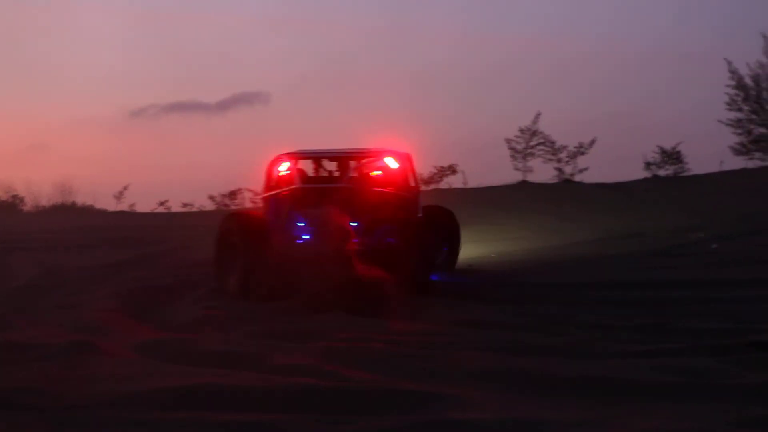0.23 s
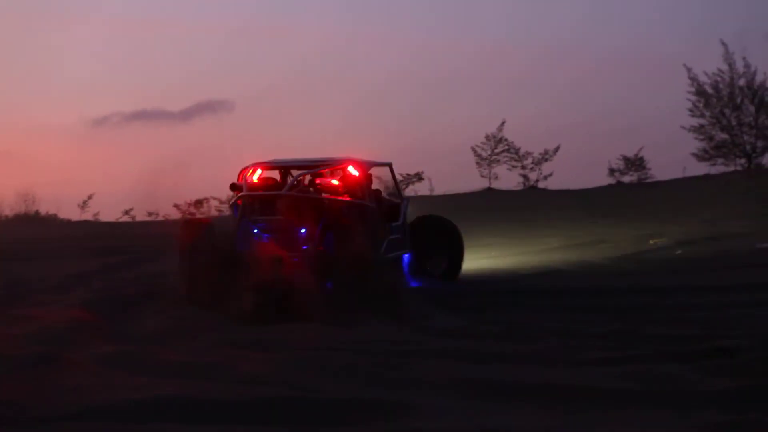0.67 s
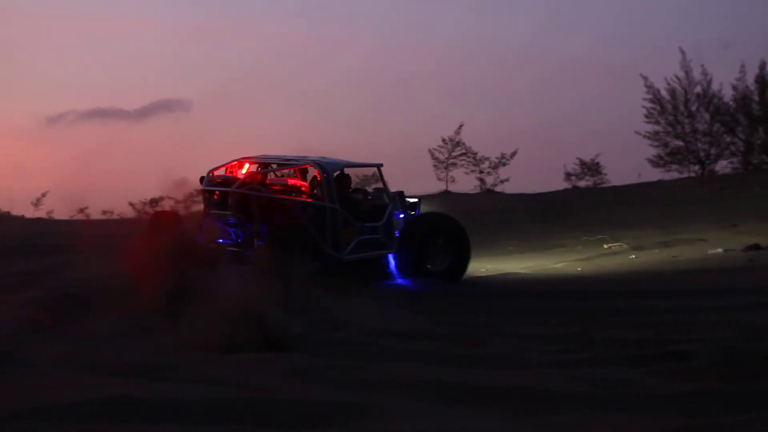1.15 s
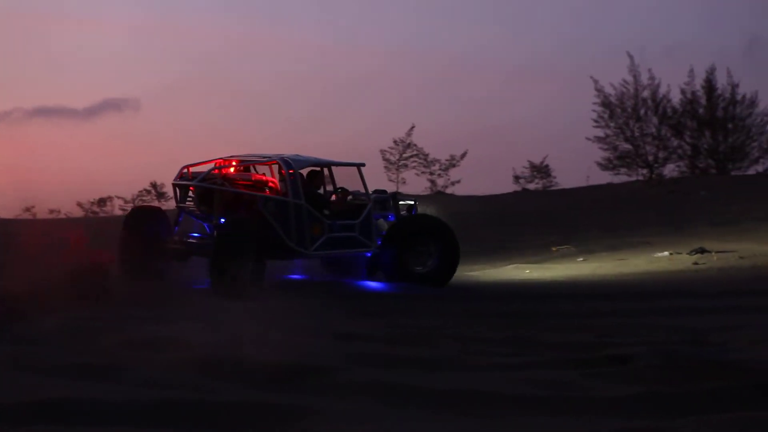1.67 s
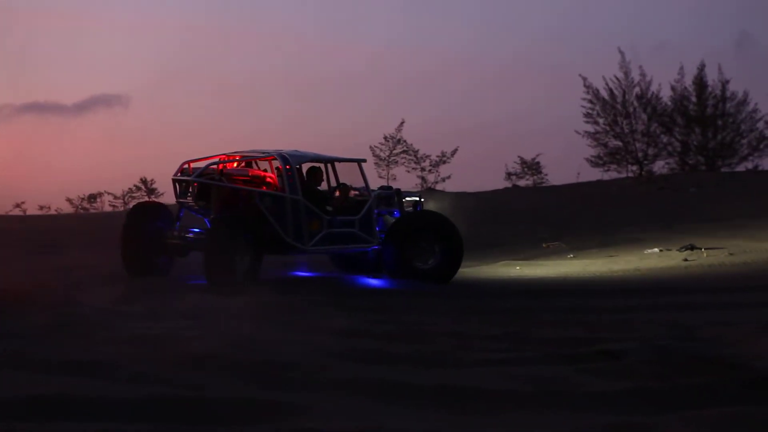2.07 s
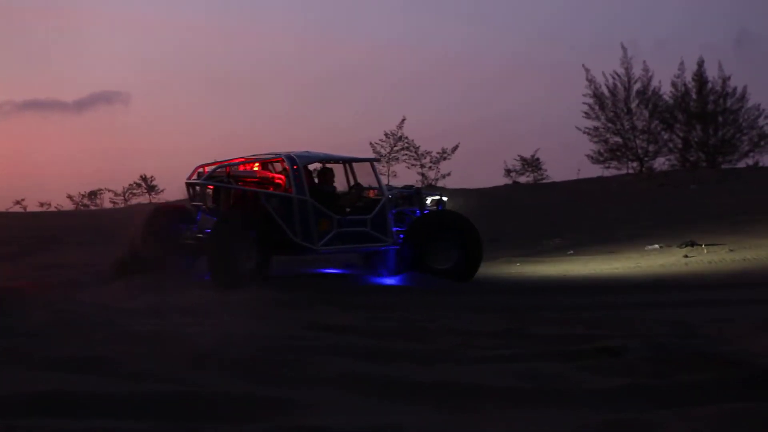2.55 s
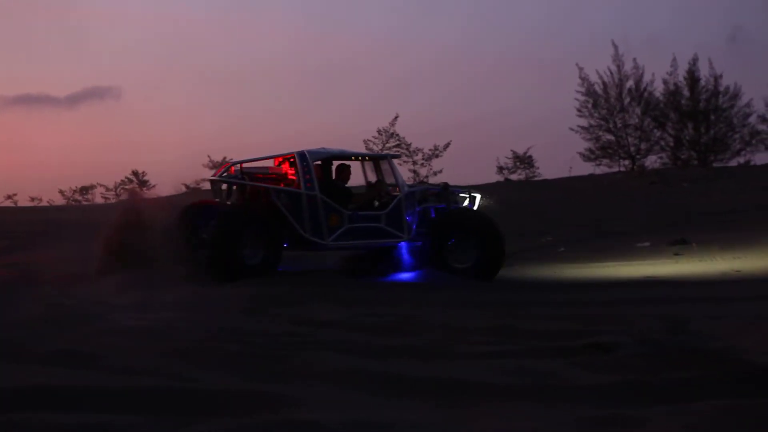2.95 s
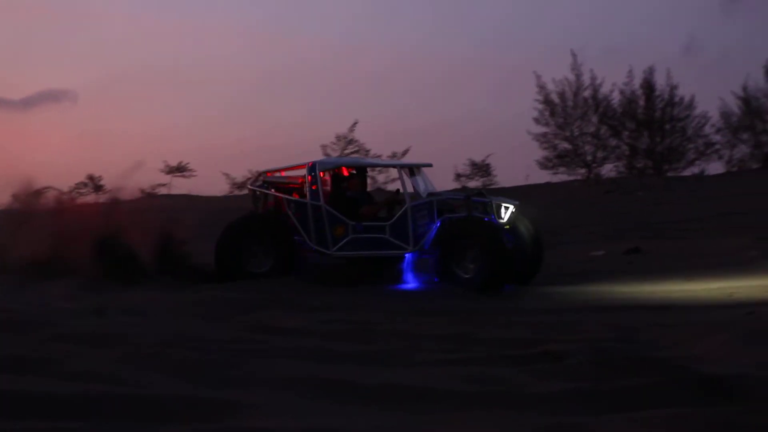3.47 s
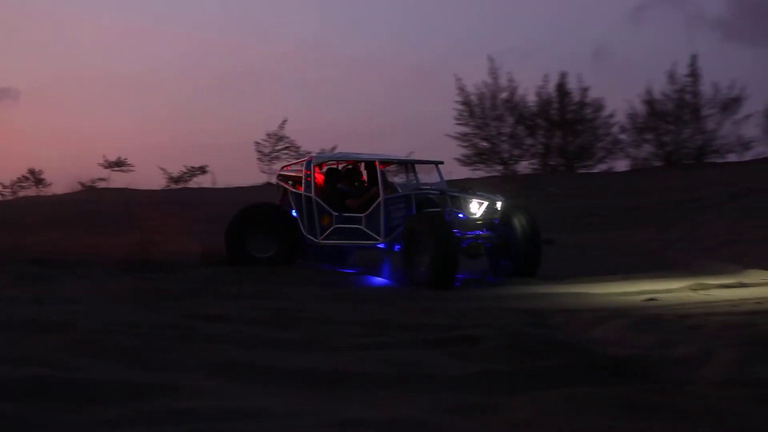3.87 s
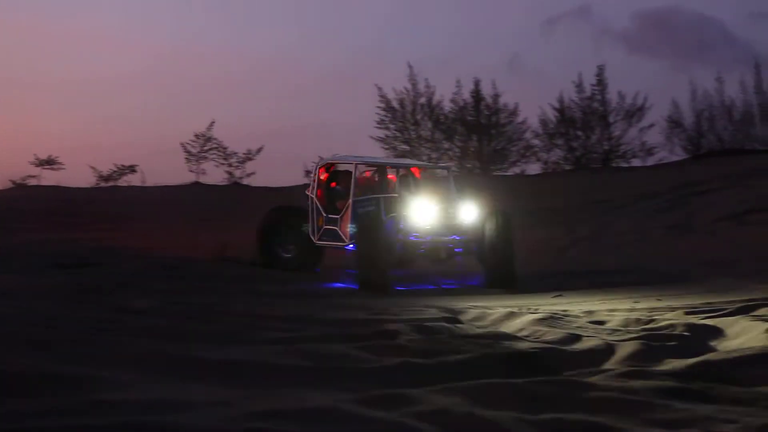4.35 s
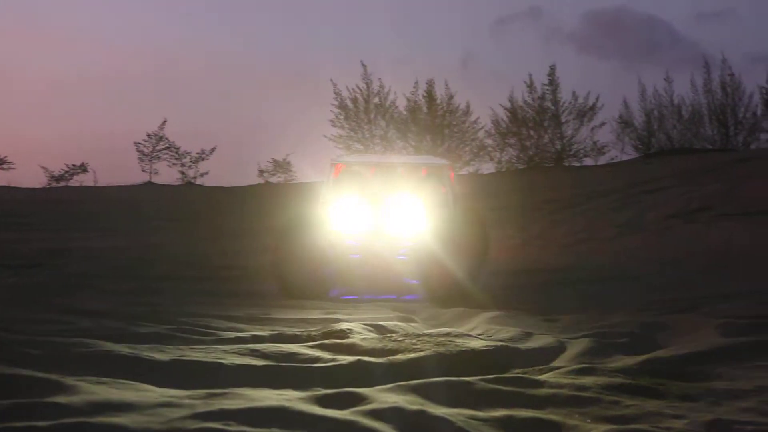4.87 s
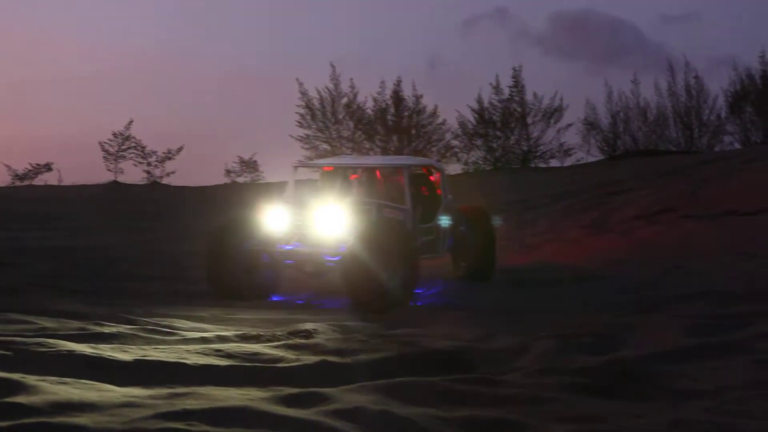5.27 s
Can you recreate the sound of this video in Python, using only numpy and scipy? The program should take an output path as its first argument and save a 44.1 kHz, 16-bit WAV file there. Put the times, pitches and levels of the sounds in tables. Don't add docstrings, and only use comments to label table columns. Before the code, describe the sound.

A large uneven-firing engine booms, growls and rasps as a buggy circles on sand. Two strong revs and a weaker third are separated by falling revs and sharp exhaust snaps. The treble dulls as the pipes turn away, a low airy fan wash remains, and brakes squeal at the very end. Mono, medium distance, open air.

```python
import sys
import numpy as np
from scipy import signal
from scipy.fft import rfft, irfft, next_fast_len
from scipy.io import wavfile
from scipy.ndimage import uniform_filter1d, map_coordinates

SR = 44100
rng = np.random.default_rng(int(sys.argv[2]) if len(sys.argv) > 2 else 0)


def unload_audio(sound):
    columns = np.transpose(np.atleast_2d(sound))
    steps = np.round(np.clip(columns, -1, 1) * 32767)
    wavfile.write(sys.argv[1], SR, steps.astype(np.int16))


def gain_from_db(level_db):
    decades = np.asarray(level_db, float) / 20
    return 10 ** decades


N = 242991


def unit(x):
    return x / np.sqrt(np.mean(x ** 2) + 1e-20)


def along(points, hz):
    point_hz, value = np.transpose(points)
    return np.interp(np.log(hz + 1), np.log(point_hz + 1), value)


def curves(rows):
    start_s, *columns = np.transpose(rows)
    return [np.interp(np.arange(N) / SR, start_s, column) for column in columns]


def wobble(rate_hz):
    knots = rng.standard_normal(int(N * rate_hz / SR) + 4)
    return map_coordinates(knots, [np.arange(N) * rate_hz / SR])


def noise():
    return rng.standard_normal(N)


def coloured(x, spectrum):
    size = 2 * next_fast_len(N // 2 + SR // 4)
    level_db = np.maximum(along(spectrum, np.fft.rfftfreq(size, 1 / SR)), -120)
    cepstrum = irfft(np.log(gain_from_db(level_db)), size)
    cepstrum[1:size // 2] *= 2
    cepstrum[size // 2 + 1:] = 0
    return irfft(rfft(x, size) * np.exp(rfft(cepstrum)), size)[:N]


def steady(x, span_s):
    power = np.abs(uniform_filter1d(x ** 2, int(span_s * SR), mode="reflect"))
    return x / np.sqrt(power + 1e-20)


def puffs(at, size, decay_s):
    kicks = np.bincount(at, size, N)
    return signal.lfilter([1], [1, -np.exp(-1 / (decay_s * SR))], kicks)


# start_s [s], cycle_rate [cycles/s]
ENGINE_SPEED = [(0.0, 21.8), (0.07, 22.62), (0.15, 24.28), (0.22, 26.47), (0.3, 26.77), (0.38, 27.58),
                (0.44, 29.85), (0.5, 32.64), (0.55, 32.5), (0.6, 32.67), (0.65, 35.54), (0.7, 36.54),
                (0.75, 34.48), (0.8, 34.16), (0.9, 30.7), (1.0, 25.78), (1.1, 19.89), (1.25, 16.22),
                (1.35, 12.8), (1.5, 9.97), (1.65, 7.91), (1.8, 5.89), (1.95, 5.79), (2.02, 6.72),
                (2.1, 7.9), (2.18, 10.49), (2.25, 12.07), (2.35, 14.72), (2.5, 16.08), (2.6, 17.68),
                (2.7, 19.8), (2.85, 24.2), (3.0, 28.26), (3.15, 33.09), (3.24, 34.47), (3.3, 32.18),
                (3.4, 29.0), (3.5, 22.82), (3.6, 20.29), (3.65, 17.36), (3.75, 19.5), (3.83, 21.49),
                (3.92, 22.62), (4.0, 22.42), (4.1, 20.69), (4.25, 20.6), (4.38, 18.74), (4.5, 17.39),
                (4.65, 15.11), (4.8, 13.02), (4.95, 10.83), (5.1, 9.95), (5.25, 9.45), (5.4, 7.8),
                (5.51, 7.56)]
LEADERS = [8, 5, 3, 6, 11, 16]
FAMILY = {8: [8], 5: [5, 7, 9], 3: [3], 6: [2, 4, 6, 10], 11: [11, 13, 15, 17, 19], 16: [12, 14, 16, 18,
          24]}
WEAKER = {7: -9.5, 9: -10, 2: -10, 4: -9, 10: 2.7, 13: -1.4, 15: -8, 17: -7.5, 19: -12, 12: -11.5, 14:
          -11.5, 18: -10.5, 24: -8.5}
# start_s [s], then level_db [dB] of multiples 8, 5, 3, 6, 11, 16
LEADER_LEVELS = [(0.0, -15, -21, -53, -25, -37, -43), (0.11, -18, -34, -45, -28.5, -27, -37),
                 (0.22, -18, -31, -37, -26, -34.5, -43), (0.33, -14, -29, -31, -33.5, -26, -33),
                 (0.44, -15, -27.5, -33, -29, -34, -55), (0.55, -19, -31, -23, -22, -30, -50),
                 (0.66, -26, -29, -22, -25, -46, -56), (0.77, -36, -25.5, -27.5, -35, -42.5, -53),
                 (0.88, -36.5, -22, -25.5, -33.5, -52, -65), (0.99, -26, -27.5, -31, -25.5, -53, -62),
                 (1.1, -38, -24, -37, -39, -33.5, -63), (1.21, -31.5, -29, -49, -31, -45, -58),
                 (1.32, -28, -37.5, -58, -43, -56, -51), (1.43, -26, -50, -71, -49, -42, -59),
                 (1.54, -27, -73, -79, -65, -35, -55), (1.65, -55, -79, -87, -73, -43.5, -49),
                 (1.76, -60, -84, -85, -78, -41, -45), (1.87, -66, -73, -79, -76, -65, -31.5),
                 (1.98, -51, -72, -91, -68, -40.5, -28.5), (2.09, -29.5, -64, -72, -62, -29, -35),
                 (2.2, -17.5, -31, -76, -47, -29.5, -35), (2.31, -15.5, -27.5, -56, -45, -27.5, -49),
                 (2.42, -22.5, -25.5, -54, -50, -27.5, -43), (2.53, -22, -20.5, -49, -44, -29.5, -51),
                 (2.64, -25.5, -15, -41, -28, -28, -33), (2.75, -38, -13.5, -32, -40, -25, -39),
                 (2.86, -36, -16.5, -26, -44, -35, -36), (2.97, -22.5, -19.5, -21.5, -31, -42, -29.5),
                 (3.08, -19, -22, -19, -48, -40, -43), (3.19, -25, -23.5, -23, -46, -41, -41),
                 (3.3, -40, -22, -29, -39, -53, -58), (3.41, -42, -25, -20, -44, -66, -59.5),
                 (3.52, -45, -26, -37, -34, -65, -71), (3.63, -36, -31, -49, -48, -43.5, -77),
                 (3.74, -27.5, -17.5, -50, -51, -34.5, -53), (3.85, -55, -18, -41, -55, -34, -54),
                 (3.96, -48, -20.5, -58, -45, -44, -47), (4.07, -50, -23.5, -57, -50, -37, -67),
                 (4.18, -39, -22.5, -60, -51, -34.5, -71), (4.29, -32, -28.5, -58, -45, -33, -68.5),
                 (4.4, -37.5, -49, -47, -32.5, -34, -79), (4.51, -30.5, -48, -57, -40.5, -37.5, -73),
                 (4.62, -23.5, -52, -68, -30.5, -39.5, -57), (4.73, -23.5, -55, -63, -39, -37, -57),
                 (4.84, -24, -56, -70, -49, -46, -56), (4.95, -23.5, -64, -62, -57, -37.5, -47),
                 (5.06, -33, -73, -72, -61, -36.5, -38), (5.17, -31, -61, -70, -54, -34.5, -44),
                 (5.28, -46, -53, -61, -74, -39, -38), (5.39, -58, -60, -65, -67, -31, -42),
                 (5.51, -47, -63, -58, -68, -39, -29)]
# pitch_hz [Hz], level_db [dB]
PIPE = [(20, -64), (45, -31), (65, -15), (95, 8), (135, -1), (180, -1.5), (217, 1), (260, -10.5),
        (310, -22), (400, -31), (540, -18), (760, -42.5), (1200, -37), (2000, -62)]


def exhaust():
    cycle_hz, = curves(ENGINE_SPEED)
    turn = 2 * np.pi * np.cumsum(cycle_hz) / SR
    pulses = 0
    for leader, leader_db in zip(LEADERS, curves(LEADER_LEVELS)):
        for multiple in FAMILY[leader]:
            pipe_db = along(PIPE, multiple * cycle_hz) - along(PIPE, leader * cycle_hz)
            level_db = leader_db + WEAKER.get(multiple, 0) + pipe_db
            level_db = np.minimum(level_db, leader_db + 2.5) + 0.8 * wobble(16)
            drift = 0.2 * wobble(12) + rng.uniform(0, 2 * np.pi)
            pulses = pulses + np.sqrt(2) * gain_from_db(level_db) * np.sin(multiple * turn + drift)
    firings = np.flatnonzero(np.diff(np.floor(turn * 8 / (2 * np.pi))))
    return pulses, firings


# start_s [s], boom_db, growl_db, rasp_db, hiss_db [dB],
# misfire_db [dB, added to the boom], crackle_db [dB over the hiss]
GAS_LEVELS = [(0.0, -18, -26, -28.5, -40.5, -19.5, -1), (0.17, -11, -30.5, -30.5, -42.5, -15.5, 1.5),
              (0.41, -16, -30, -24, -36.5, -16.5, 3), (0.63, -19, -24, -22, -35.5, -13, 1),
              (0.71, -13, -32.5, -28.5, -36.5, -17, -1), (0.78, -17, -32, -33.5, -40, -14, -0.5),
              (0.95, -22, -32.5, -36, -41, -12, 3), (1.06, -25, -42.5, -43, -45, -15, 0.5),
              (1.3, -23.5, -48, -51.5, -51.5, -11.5, -0.5), (1.49, -29.5, -55, -57.5, -56, -12, 0.5),
              (1.66, -40, -57.5, -61, -59, -11, -5.5), (1.96, -30.5, -66, -54, -58, -11, 0),
              (2.06, -19.5, -51, -40.5, -51, -15, 6), (2.22, -15.5, -37, -32, -42.5, -11.5, 3.5),
              (2.42, -20, -39.5, -36, -43.5, -18, 5.5), (2.58, -17, -37.5, -33, -40, -9, 5.5),
              (2.7, -11, -30.5, -27.5, -40.5, -11, 6.5), (2.95, -17, -34.5, -25.5, -38.5, -15, 6),
              (3.05, -14, -25.5, -26.5, -37.5, -17, 7.5), (3.22, -13, -31.5, -32, -42.5, -12, 1.5),
              (3.24, -10, -28, -29.5, -44, -15, 1), (3.35, -18, -44, -47.5, -46.5, -13, -2),
              (3.44, -19, -33, -41, -48.5, -13, -1), (3.48, -19, -41.5, -52, -49, -18, -0.5),
              (3.57, -25, -47, -50.5, -54.5, -16, -2), (3.64, -19, -40, -58, -52, -16, -1.5),
              (3.71, -16, -42, -39, -45.5, -13, 0.5), (3.78, -18.5, -36, -38.5, -45, -12.5, 1),
              (3.94, -25, -39, -44.5, -50.5, -22, -1), (4.33, -20.5, -45, -55.5, -54.5, -13.5, -1),
              (4.45, -26, -47.5, -56.5, -58, -14, -1.5), (4.68, -19, -56.5, -61.5, -62.5, -16, -3.5),
              (4.9, -28.5, -57, -59.5, -68.5, -14, -2.5), (5.03, -23.5, -60.5, -66, -65.5, -14.5, -1.5),
              (5.4, -26, -53.5, -63.5, -64.5, -12.5, -3), (5.51, -30, -58, -61, -61.5, -14, 1)]
# pitch_hz [Hz], level_db [dB per Hz]
GROWL = [(190, -30), (320, -4.5), (357, -4.5), (387, -7.5), (533, -0.5), (655, -4), (780, -10), (1010, -45),
         (1720, -120)]
# pitch_hz [Hz], level_db [dB per Hz]
RASP = [(450, -38.5), (760, -6), (848, 3), (912, 4), (1050, 0), (1230, 3.5), (1650, -9), (1810, -16.5),
        (2000, -8), (2600, -41.5), (4400, -120)]
# pitch_hz [Hz], level_db [dB per Hz]
HISS = [(1000, -39.5), (1700, 5), (1840, -9), (2030, 1), (2200, 0), (2640, -1), (3150, -5), (4370, -2.5),
        (5120, -0.5), (6910, 0.5), (10600, -22), (14000, -30)]
NEAR_BANK = [1, 0, 0, 1, 0, 1, 1, 0]
# pitch_hz [Hz], level_db [dB]
CRACKLE_BANDS = [(2800, -1.5), (5000, -2.5), (6600, -1), (9500, -9), (13000, -20.5)]


def gas(firings):
    boom_db, growl_db, rasp_db, hiss_db, misfire_db, crackle_db = curves(GAS_LEVELS)
    count = len(firings)
    chance = rng.standard_normal((count, 3 + len(CRACKLE_BANDS)))
    burning = unit(np.bincount(firings, chance[:, 0], N)) + 1.86 * noise()
    boom = steady(coloured(burning, PIPE), span_s=0.2)
    jet = 0.67 + unit(puffs(firings, gain_from_db(2.6 * chance[:, 1]), decay_s=0.0035))
    growl = steady(coloured(jet * noise(), GROWL), span_s=0.16)
    rasp = steady(coloured(jet * noise(), RASP), span_s=0.17)
    hiss = gain_from_db(0.72 * wobble(13)) * unit(coloured(noise(), HISS))
    near = gain_from_db(6.1 * np.take(NEAR_BANK, np.arange(count) % len(NEAR_BANK)))
    crackle = 0
    for k, (hz, band_db) in enumerate(CRACKLE_BANDS):
        spit_size = near * gain_from_db(2 * chance[:, 2] + 3.5 * chance[:, 3 + k])
        spit = uniform_filter1d(puffs(firings, spit_size, decay_s=0.0025), size=130)
        shape = [(hz * 0.5, -30), (hz * 0.82, -3), (hz, 0), (hz * 1.31, -3), (hz * 2, -24)]
        crackle = crackle + gain_from_db(band_db) * unit(coloured(spit * noise(), shape))
    jets = gain_from_db(hiss_db + 2.5) * (hiss + gain_from_db(crackle_db) * steady(crackle, span_s=0.57))
    body = gain_from_db(boom_db + misfire_db) * boom + gain_from_db(growl_db - 3.0) * growl
    return body + gain_from_db(rasp_db) * rasp + jets


# start_s [s], hidden_share [0-1]
AWAY = [(0, 0), (1.6, 0.48), (2, 0), (3.15, 0.5), (3.3, .7), (3.62, 0.48), (3.68, 0.46), (3.9, 0.57),
        (3.97, .85), (4.6, 0.6), (5.51, 0.8)]
# pitch_hz [Hz], level_db [dB]
SHADE = [(5000, 0.5), (8500, -3), (11000, -11), (15000, -19.5)]


def shaded(x):
    away = np.clip(curves(AWAY)[0], 0, 1)
    return (1 - away) * x + away * coloured(x, SHADE)


# pitch_hz [Hz], level_db [dB per Hz]
AIR = [(18, -63), (30, -27), (48, -22), (69, 1), (90, 4), (146, -35), (229, -12), (253, -44), (800, -48),
       (978, -24), (1050, -48), (6740, -46), (12000, -70), (15600, -102), (22000, -120)]
# pitch_hz [Hz], level_db [dB]
BELT = [(2150, -30), (2400, -4), (2550, 2), (2750, -7), (3100, -31)]


def wash():
    air = gain_from_db(-38 + 1.3 * wobble(5.9)) * unit(coloured(noise(), AIR))
    belt = gain_from_db(-67 + 3.3 * wobble(23)) * unit(coloured(noise(), BELT))
    return air + belt


# start_s [s], level_db [dB peak], pitch_hz [Hz]
TICKS = [(0.2733, -14, 9500), (0.814, -13, 6560), (0.899, -11, 6700), (0.9124, -19, 6980),
         (0.952, -21, 4940), (1.0638, -24, 7206), (1.1994, -23, 4700), (1.2138, -32, 7740),
         (1.258, -25, 4540), (1.2844, -43, 4840), (1.3833, -36, 6600), (1.407, -32, 5370),
         (1.432, -32, 6180), (1.477, -46, 5170), (1.581, -24, 8400), (2.0023, -31, 6530),
         (2.0213, -26, 9530), (2.0383, -19, 6500), (2.0562, -21, 6570), (2.0887, -20, 5030),
         (2.1071, -20, 6350), (2.1615, -12, 6500), (2.1979, -34, 7620), (2.3521, -12, 5730),
         (2.5202, -9, 7850), (2.5416, -10, 6800), (2.8414, -18, 5650), (3.0415, -5, 5340),
         (3.2244, -31, 5660), (3.9902, -22, 5170), (4.0846, -18.5, 5800), (4.202, -24, 5400),
         (4.358, -19.5, 5600), (4.5231, -32, 5695), (4.7699, -20.5, 5730)]


def ticks():
    out, t = np.zeros(N + SR), np.arange(SR // 30) / SR
    for start_s, level_db, hz in TICKS:
        roughness = 2.0 * np.cumsum(rng.standard_normal(len(t))) / 8
        ring = np.sin(2 * np.pi * hz * t + roughness)
        snap = gain_from_db(-60 * t / 0.01) * (ring + 0.38 * rng.standard_normal(len(t)))
        puff = 0.2 * gain_from_db(-60 * t / 0.051) * rng.standard_normal(len(t))
        onset = 1 - np.exp(-t / 0.00037)
        out[round(start_s * SR):][:len(t)] += gain_from_db(level_db - 1) * (snap + puff) * onset
    return coloured(out[:N], [(1500, -33), (3500, -2.5), (8000, -0.5), (15000, -19.5)])


# centre_s [s], length_s [s], pitch_hz [Hz], level_db [dB]
SQUEAKS = [
    (.585, .02, 2050, -40),
    (.62, .02, 2100, -43),
    (0.71, .016, 5140, -33),
    (.78, .03, 5570, -36),
    (3.327, 0.016, 5100, -41),
    (3.325, 0.017, 5940, -45),
    (3.716, 0.027, 2040, -53),
    (3.663, .025, 3000, -50),
]


def squeaks():
    t, out = np.arange(N) / SR, 0
    for centre_s, length_s, hz, level_db in SQUEAKS:
        swell = np.exp(-((t - centre_s) / length_s) ** 4)
        out = out + gain_from_db(level_db) * swell * np.sin(2 * np.pi * hz * t + 0.71 * wobble(90))
    return out


# start_s [s], pitch_hz [Hz], level_db [dB]
MOANS = [
    [(1.45, 1003, -67), (1.514, 992, -58), (2.008, 991, -52.5), (2.018, 970, -66), (2.04, 989.0, -55),
     (2.05, 989.5, -71)],
    [(5.1, 1002, -64), (5.126, 986, -73), (5.336, 1002, -59.5), (5.482, 1013, -67), (5.51, 972.3, -65)],
]
# start_s [s], pitch_hz [Hz], level_db [dB]
SQUEAL = [
    (5.36, 4990, -84),
    (5.446, 4970, -20.5),
    (5.47, 4955, -18),
    (5.51, 4960, -18.5),
]
# multiple, level_db [dB]
SQUEAL_TONES = [
    (1, 2),
    (2, -45),
    (3, -50),
]


def brake():
    t, moan = np.arange(N) / SR, 0
    for rows in MOANS:
        hz, level_db = curves(rows)
        touching = uniform_filter1d(1. * (t > rows[0][0]) * (t < rows[-1][0]), 900)
        loudness = gain_from_db(level_db + 5 + 1.5 * wobble(24.47))
        turn = 2 * np.pi * np.cumsum(hz + 3 * wobble(24)) / SR
        moan = moan + touching * loudness * np.sin(turn)
    hz, level_db = curves(SQUEAL)
    turn = 2 * np.pi * np.cumsum(hz) / SR
    tone = sum(gain_from_db(tone_db) * np.sin(multiple * turn) for multiple, tone_db in SQUEAL_TONES)
    return moan + (t > SQUEAL[0][0]) * gain_from_db(level_db + 1.5) * tone


def scene():
    pulses, firings = exhaust()
    pipes = pulses + shaded(gas(firings) + ticks())
    return (pipes + wash() + squeaks() + brake())[None]


def low_pass(x):
    return signal.sosfilt(signal.butter(12, 15780, fs=SR, output="sos"), x)


def record(dry):
    passed = np.fft.rfftfreq(N, 1 / SR) < 15800
    limited = irfft(rfft(dry) * passed, N)
    return low_pass(limited)


dry = scene()
out = record(dry)
unload_audio(out)
```